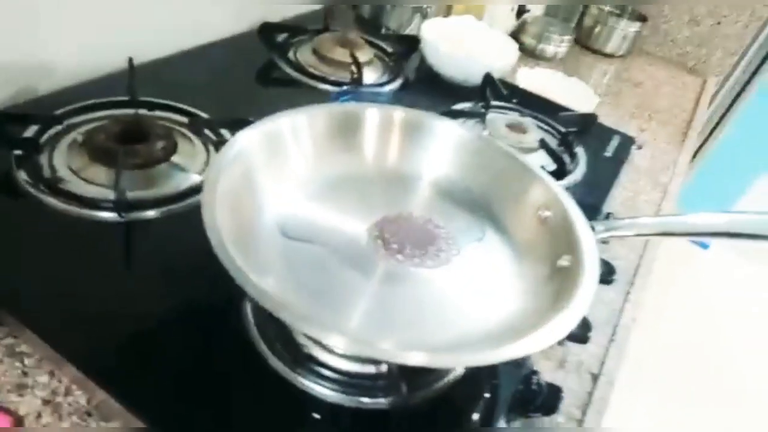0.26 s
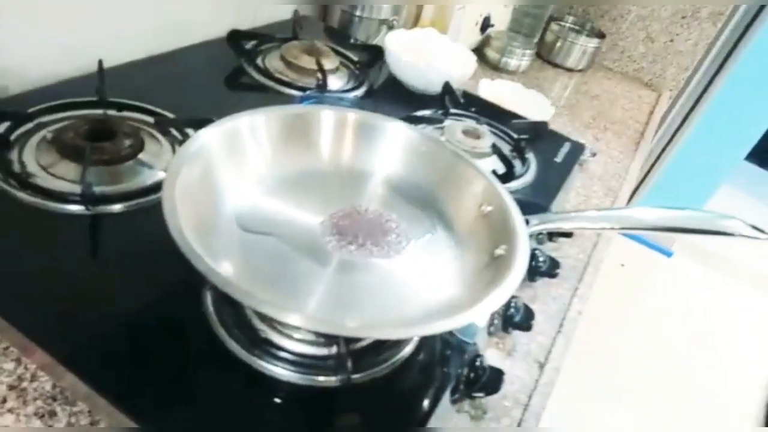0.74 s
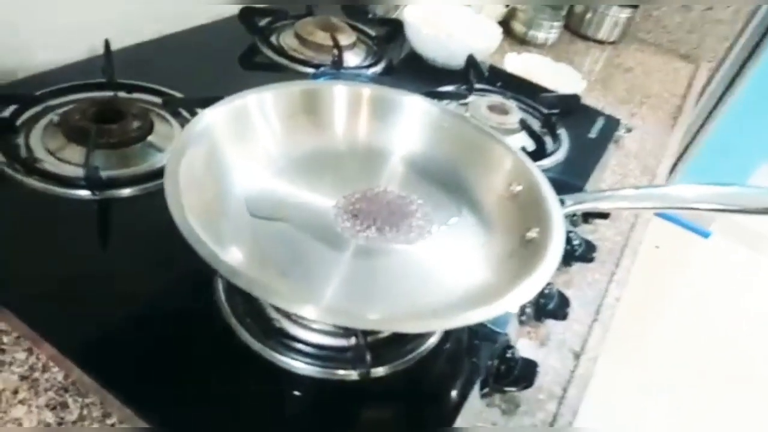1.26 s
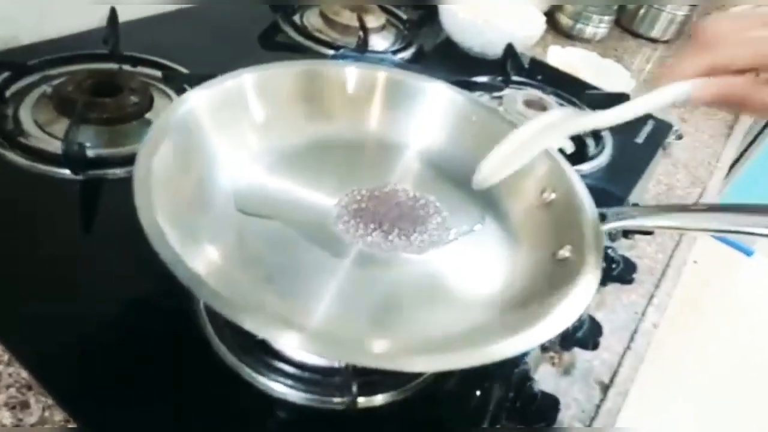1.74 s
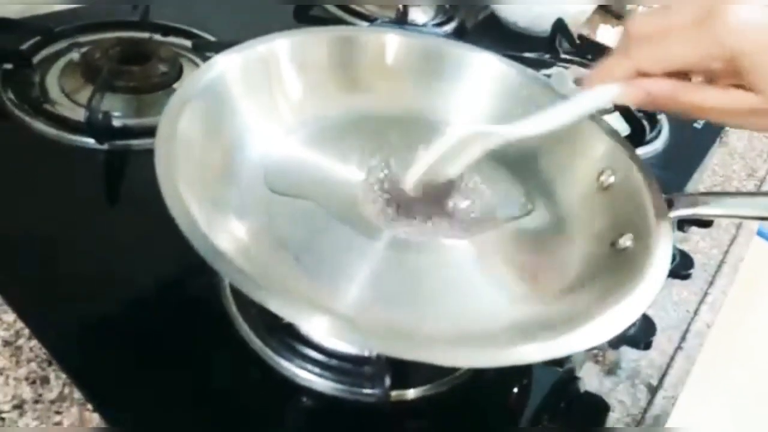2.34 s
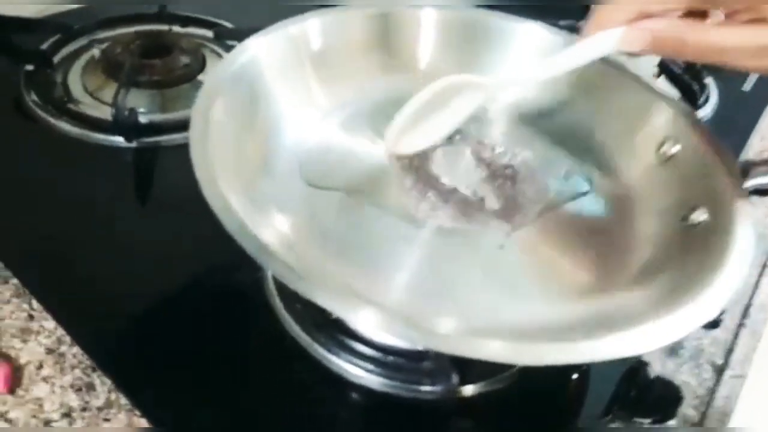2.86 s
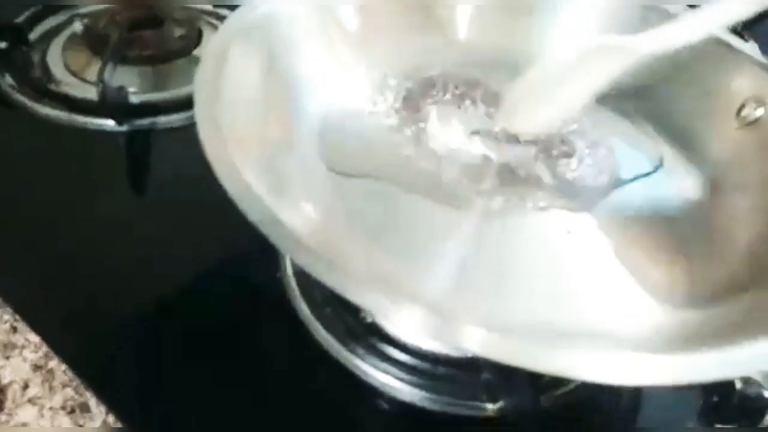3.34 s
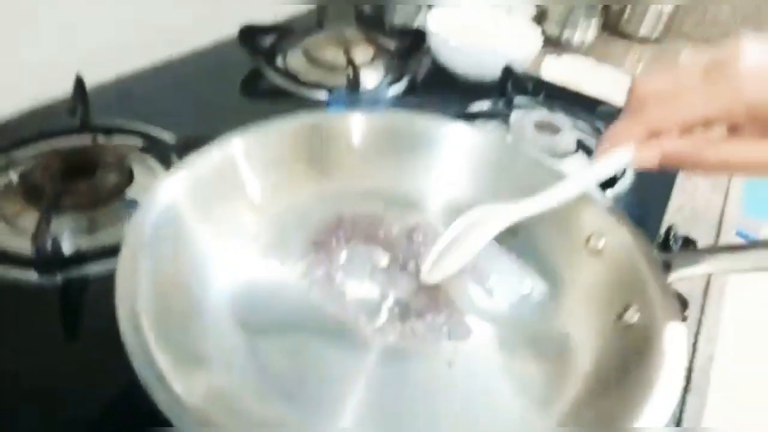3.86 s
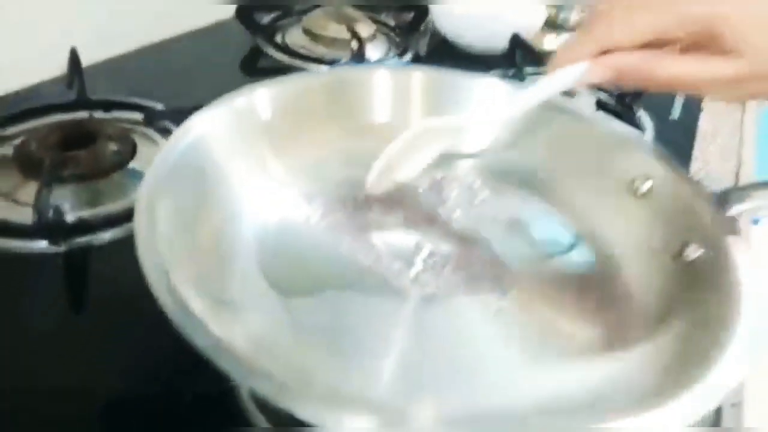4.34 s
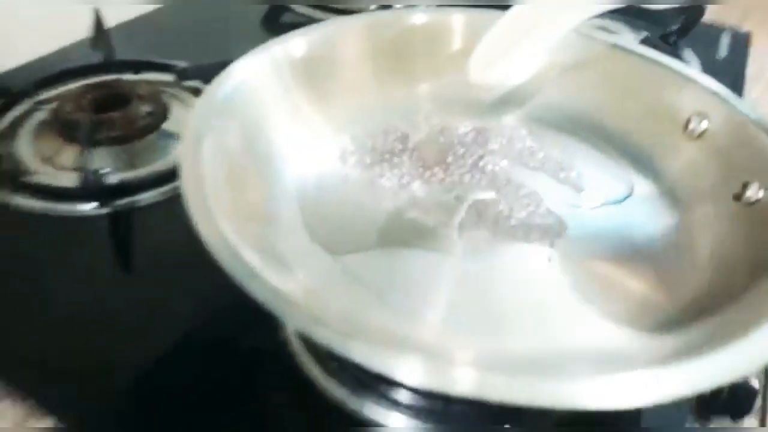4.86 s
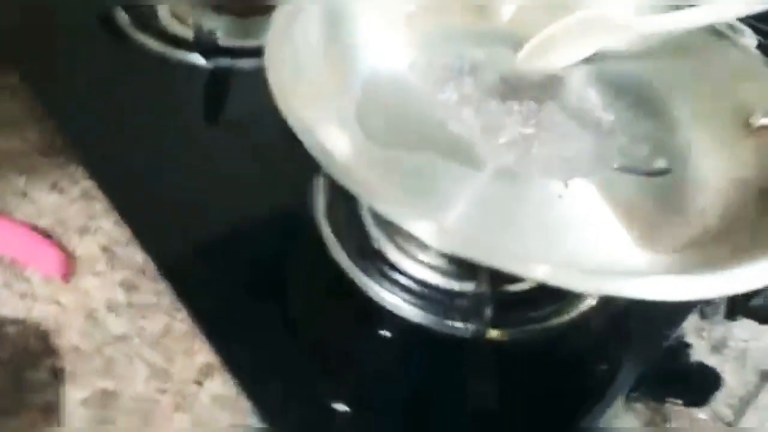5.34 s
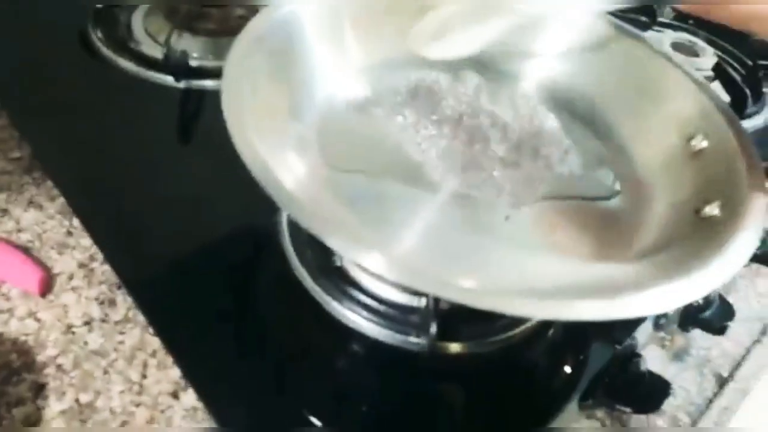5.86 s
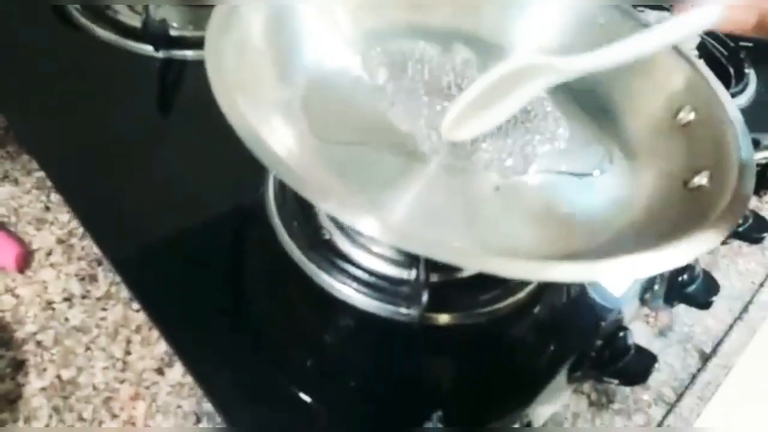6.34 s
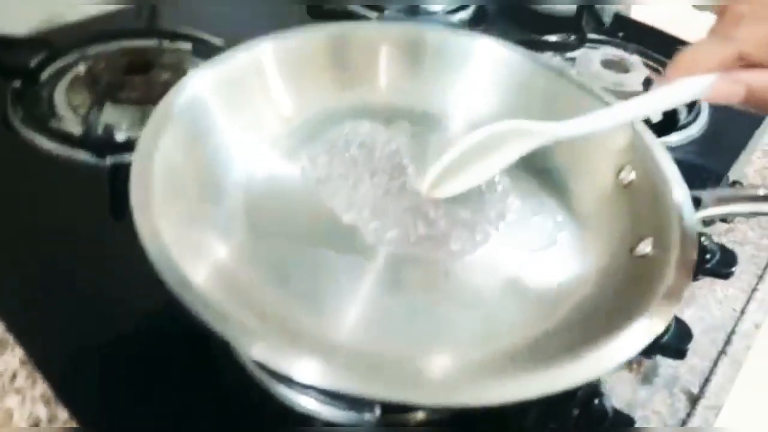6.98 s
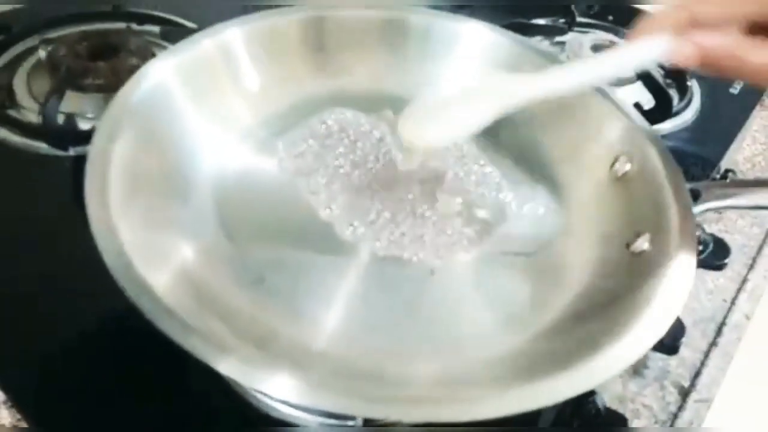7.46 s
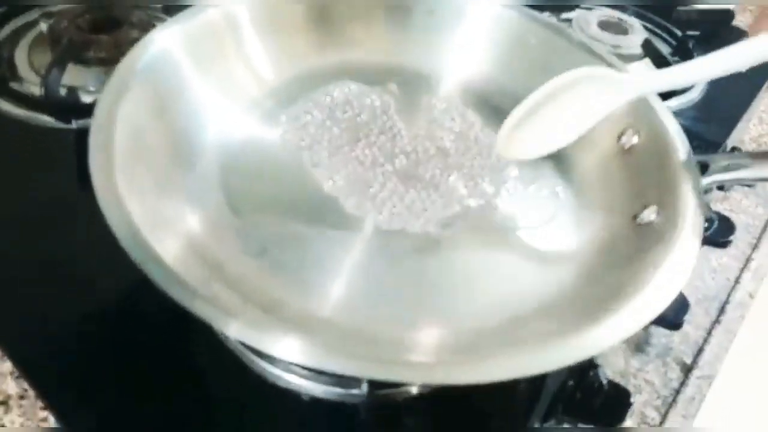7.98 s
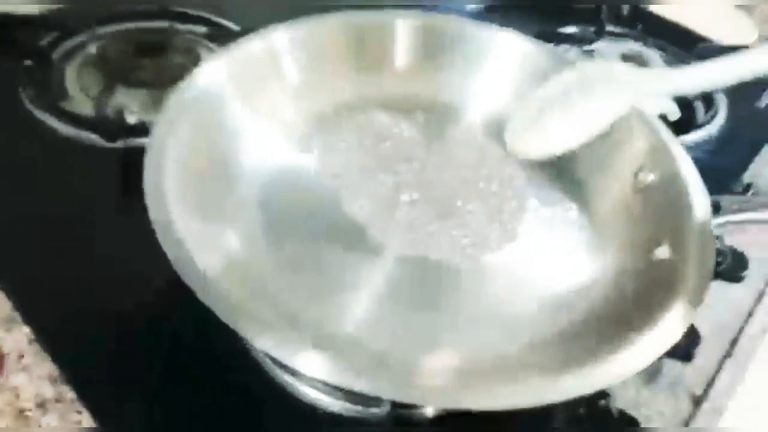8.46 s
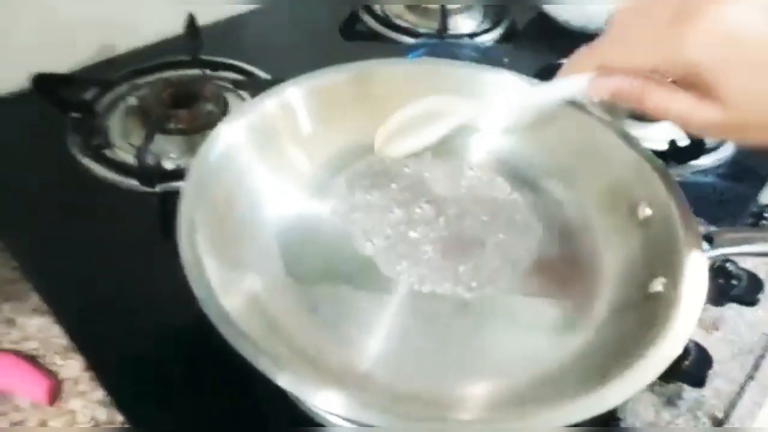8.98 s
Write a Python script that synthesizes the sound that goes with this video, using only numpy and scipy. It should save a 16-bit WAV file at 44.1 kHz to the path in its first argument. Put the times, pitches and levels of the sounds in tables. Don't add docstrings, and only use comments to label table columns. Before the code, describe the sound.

In a small, lightly echoing kitchen, a dish knocks twice on the counter with a brief ringing buzz. Quiet sizzling follows, then spoon taps and scrapes ring a steel pan while mustard seeds pop in bright, dry clicks, densest in the middle. Stirring thins out later, leaving steady fine fizz, sparse pops and a distant horn. Close handheld stereo microphone with soft handling rumble; pan treble leans right.

```python
import sys
import numpy as np
from scipy import signal
from scipy.fft import rfft, irfft
from scipy.io import wavfile
from scipy.ndimage import uniform_filter1d

SR = 44100
rng = np.random.default_rng(int(sys.argv[2]) if len(sys.argv) > 2 else 0)


def wav_out(sig):
    wavfile.write(sys.argv[1], SR, np.round(np.clip(np.atleast_2d(sig).T, -1, 1) * 32767).astype(np.int16))


def ratio_of_db(decibels):
    return 10 ** (np.asarray(decibels, float) / 20)


N = 406161


def rms_one(x):
    return x / np.sqrt(np.mean(x ** 2) + 1e-20)


def at_hz(points, hz):
    point_hz, value = np.transpose(points)
    return np.interp(np.log(hz + 1), np.log(point_hz), value)


def shape(points, size=2048):
    spectrum_db = at_hz(points, np.fft.rfftfreq(size, 1 / SR))
    cepstrum = irfft(np.log(ratio_of_db(spectrum_db)))
    cepstrum[1:size // 2] *= 2
    cepstrum[size // 2 + 1:] = 0
    return irfft(np.exp(rfft(cepstrum)))


def through(x, response):
    return signal.oaconvolve(np.atleast_2d(x), np.atleast_2d(response), axes=1)[:, :N]


def band(x, low_hz, high_hz):
    return signal.sosfilt(signal.butter(2, [low_hz, high_hz], "band", fs=SR, output="sos"), x)


def level_in(x, low_hz, high_hz):
    return x / np.sqrt(np.mean(band(x, low_hz, high_hz) ** 2))


def drift(rate):
    r = np.exp(-80 * np.pi * rate / SR)
    noise = rng.standard_normal(N // 40 + 2002)
    slow = signal.lfilter([1], [1, -2 * r, r * r], noise)[2000:]
    return np.interp(np.arange(N) / 40, np.arange(len(slow)), rms_one(slow))


def grains(per_s, spread_db, channels=1):
    size_db = spread_db * np.minimum(rng.exponential(1, (channels, N)), 5)
    sizes = ratio_of_db(size_db) * rng.choice([-1, 1], (channels, N))
    return rms_one(sizes * (rng.random((channels, N)) < per_s / SR))


def gestures(start, length, db, attack_s, swell_db, release_s):
    t, out = np.arange(N) / SR, np.full(N, -99.)
    for s, d, top in zip(start, length, db):
        a, b = max(int((s - attack_s) * SR), 0), int((s + d + release_s) * SR)
        corners_s = [s - attack_s, s, s + d, s + d + release_s]
        level = top + np.interp(t[a:b], corners_s, [-60, -swell_db, 0, -60])
        out[a:b] = np.maximum(out[a:b], level)
    return out


def body(modes, sides, soft_s=0.00018):
    t = np.arange(SR // 4)[:, None] / SR
    hz, db, t60 = np.transpose(modes)
    phases = sides * rng.uniform(-np.pi, np.pi, (2, 1, len(hz))) * np.clip(hz / 3000, 0, 1)
    contact = (1 - np.exp(-t / soft_s)) ** 2
    return np.sum(contact * ratio_of_db(db - 60 * t / t60) * np.sin(2 * np.pi * hz * t + phases), axis=2)


def ring_level(response):
    return np.sqrt(np.sum(response ** 2) / 2)


def struck(times, levels_db, modes, sides, scatter_db, soft_s):
    out, scatter = np.zeros((2, N)), rng.normal(0, scatter_db, (len(times), len(modes)))
    for k, mode in enumerate(modes):
        clicks = np.zeros(N)
        clicks[(np.array(times) * SR).astype(int)] = ratio_of_db(levels_db + scatter[:, k])
        out += through(clicks, body([mode], sides, soft_s))
    return out


def scatter_in_bowl(x, echo_db, fade_s):
    t = np.arange(900) / SR
    echoes = band(grains(1800, 2.6, channels=2)[:, :900], 800, 18700)
    return x + through(x, echoes * ratio_of_db(echo_db) * np.exp(-t / fade_s))


# pitch_hz, fade_s (by 60 dB)
KITCHEN_FADE = [(200, 0.76), (2000, 0.62), (9000, 0.5)]


def kitchen(x):
    t, tail = np.arange(SR // 2) / SR, 0
    for hz in 125 * 2. ** np.arange(7):
        noise = band(rng.standard_normal((2, len(t))), hz / np.sqrt(2), hz * np.sqrt(2))
        tail = tail + noise * ratio_of_db(-60 * t / at_hz(KITCHEN_FADE, hz)) * np.clip(t / 0.0038, 0, 1)
    return through(x, tail / ring_level(tail))


# pitch_hz, level_db (per Hz)
ROOM_TONE = [(15, -26), (25, -13), (69, -14.5), (107, -4), (197, -7), (224, -13.5), (279, -11.5),
             (450, -22), (680, -17.5), (845, -21.5), (4500, -26.5), (5850, -58.5)]


def room_hush():
    hush = through(rng.standard_normal((2, N)), shape(ROOM_TONE, size=8192))
    return band(level_in(hush, 530, 2120) * ratio_of_db(-70), 330, 5600)


def rumble():
    thuds = ratio_of_db(stroke_levels()[1] - 31) + ratio_of_db(rattle_levels()[0] - 24)
    low = rng.standard_normal(N) + 0.4 * rng.standard_normal((2, N))
    hum = rms_one(band(through(low, shape(ROOM_TONE, size=8192)), 68, 760))
    fizz_db = frying_level()
    steady = ratio_of_db(-68 + 0.33 * (fizz_db - fizz_db.mean()))
    return hum * (steady + uniform_filter1d(thuds, size=2000)) * ratio_of_db(5 + 2 * drift(8.2))


# start_s, length_s, level_db
HAND_SHIFTS = [(0.595, 0.39, -65.5), (2.9, .2, -72), (3.4, 0.14, -66), (4.91, .2, -64), (5.7, .15, -68),
               (6.4, 0.11, -65), (8.595, 0.18, -60)]


def grip():
    db = gestures(*np.transpose(HAND_SHIFTS), attack_s=0.67, swell_db=3.4, release_s=0.43)
    shake = rng.standard_normal(N) + 0.48 * rng.standard_normal((2, N))
    shake = rms_one(band(band(shake, 39, 93), 39, 93))
    return shake * ratio_of_db(np.maximum(db, -81) + 2.5)


# start_s, end_s, pitch_hz, level_db
HORN_NOTES = [
    (5.56, 5.705, 1050, -56.5),
    (6.213, 6.374, 1078, -60),
    (8.014, 8.238, 819, -60),
    (8.24, 8.518, 810, -69),
]


def horn():
    t, out = np.arange(N) / SR, 0
    for start, end, hz, db in HORN_NOTES:
        swell = np.clip(np.minimum((t - start) / 0.027, (end - t) / 0.025), 0, 1)
        out = out + swell * ratio_of_db(db + 2 * drift(33)) * np.sin(2 * np.pi * hz * t)
    return out * ratio_of_db([[1.5], [-1.5]])


# start_s, length_s, level_db
SOFT_SLIDES = [(1.395, 0.2, -56.5), (1.673, 0.073, -54.5), (2.065, 0.17, -56.5), (5.396, 0.28, -54),
               (9.157, .1, -62)]
# pitch_hz, level_db (per Hz)
SLIDE_TONE = [(590, -49), (1000, -8.5), (1250, -9.5), (1920, 0.5), (4080, -0.5), (9000, -15), (11700, -26),
              (19800, -120)]


def slides():
    db = gestures(*np.transpose(SOFT_SLIDES), attack_s=0.26, swell_db=0.51, release_s=0.4)
    hiss = level_in(through(grains(12000, 0.5, channels=2), shape(SLIDE_TONE)), 2000, 4900)
    return hiss * ratio_of_db(db + 2.5 + 0.37 * drift(25))


# start_s, length_s, body_db, edge_db
DISH_RATTLES = [(0.592, 0.0088, -24.5, -27), (0.597, 0.031, -30, -32), (0.657, 0.004, -31, -21.5),
                (0.671, 0.009, -33.5, -34), (0.803, 0.0039, -19.5, -14), (0.814, 0.032, -22.5, -25),
                (0.854, 0.048, -29.5, -46)]


def rattle_levels():
    s, length, body_db, edge_db = np.transpose(DISH_RATTLES)
    return (gestures(s, length, body_db, attack_s=0.0056, swell_db=-1.8, release_s=0.16),
            gestures(s, length, edge_db, attack_s=0.0019, swell_db=-1.1, release_s=0.029))


# start_s, level_db (peak)
DISH_KNOCKS = [(0.588, -25), (0.5954, -10.5), (0.8029, -6.5), (0.808, -9.5), (0.845, -32), (1.6782, -37)]
# pitch_hz, level_db, fade_s (by 60 dB)
DISH_MODES = [(850, -4, 0.097), (1186, -24, 0.098), (1580, -7.5, 0.051), (1770, -5, 0.058),
              (1928, -2, 0.053), (2160, -8, 0.054), (2290, -2, 0.023), (2240, -8, 0.047),
              (2770, -4.5, 0.053), (3240, -15, 0.052), (4050, -5, 0.092)]
# pitch_hz, level_db (per Hz)
CLACK_TONE = [(88, -31), (150, -18.5), (496, -8), (1440, -5), (1800, -1), (2260, -7), (3070, -6.5),
              (3440, -11.5), (10300, -37), (14000, -46)]


def dish():
    body_db, edge_db = rattle_levels()
    modes, clack = body(DISH_MODES, sides=0.32), shape(CLACK_TONE)
    ring = through(grains(2100, 1.0) * ratio_of_db(body_db - 13.5), modes / ring_level(modes))
    broad = level_in(through(grains(3000, 3.4, channels=2), clack), 490, 1480) * ratio_of_db(body_db - 9)
    edge = rms_one(band(grains(2700, 4.5, channels=2), 3400, 6430)) * ratio_of_db(edge_db - 7.0)
    s, db = np.transpose(DISH_KNOCKS)
    knocks = np.zeros(N)
    knocks[(s * SR).astype(int)] = ratio_of_db(db - 2.5)
    knocks = through(knocks, clack / np.max(np.abs(clack)))
    return ring + broad + edge + scatter_in_bowl(knocks, echo_db=-16.5, fade_s=0.014)


# start_s, level_db (peak), pitch_hz, fade_s (by 60 dB)
DISH_CLINKS = [(.591, -18, 3700, 0.017), (.5965, -24, 2057, 0.035), (.603, -17, 1950, 0.024),
               (.619, -26, 2120, .03), (.63, -24, 2220, 0.019), (.659, -17.5, 3720, 0.028),
               (.66, -24, 4700, .02), (.661, -26, 2270, 0.026), (0.658, -34, 6620, 0.055),
               (.672, -29.5, 3640, .03), (.677, -32, 2220, 0.044), (.679, -25, 4230, 0.023),
               (.682, -27, 3780, 0.034), (0.802, -30, 2950, .03), (0.805, -22, 3950, 0.041),
               (0.804, -25, 4700, .03), (.805, -19, 1176, 0.064)]
# start_s, length_s, level_db
FOOT_BUZZES = [(.81, .034, -23)]
# pitch_hz, level_db, fade_s (by 60 dB)
BUZZ_MODES = [(2210, -1, .035), (2330, 0, .04), (1450, -12, .03), (3400, -9, .03)]


def clinks():
    out, t = np.zeros((2, N)), np.arange(2600) / SR
    phases = rng.uniform(-0.81, 1, (len(DISH_CLINKS), 2, 1))
    for (s, db, hz, t60), phase in zip(DISH_CLINKS, phases):
        fade = ratio_of_db(db - 60 * t / t60) * (1 - np.exp(-t / 0.00095))
        at = int(s * SR)
        out[:, at:at + len(t)] += fade * np.sin(2 * np.pi * hz * t + 1.5 * phase)
    buzz = rms_one(through(grains(4000, 1.2), body(BUZZ_MODES, sides=.7)))
    buzz_db = gestures(*np.transpose(FOOT_BUZZES), attack_s=.012, swell_db=0, release_s=.02)
    return out + buzz * ratio_of_db(buzz_db)


# start_s, pitch_hz, level_db, fade_s
RING_NOTES = [(.66, 3740, -45, .3), (.81, 228, -34, .5), (2.615, 3690, -43, .78), (3.9, 721, -53, 1.0),
              (4.667, 721, -45, 1.1), (5.096, 510, -48, .055), (5.68, 1200, -55, 1.2),
              (7.15, 1346, -50, 1.1)]


def long_rings():
    out, t = np.zeros((2, N)), np.arange(SR) / SR
    edges = np.clip(np.minimum(t / 0.0027, (1 - t) / 0.33), 0, 1)
    for s, hz, db, t60 in RING_NOTES:
        at = int(s * SR)
        out[:, at:at + SR] += ratio_of_db(db - 60 * t / t60) * np.sin(2 * np.pi * hz * t) * edges
    return out * ratio_of_db(2 * drift(9.9))


# start_s, left_db (peak), right_db (peak)
PORT_HIT = (8.5331, -1.5, -24)


def seed_on_port():
    s, left_db, right_db = PORT_HIT
    t, out, tick = np.arange(300) / SR, np.zeros((2, N)), 0
    for hz, strength in [(5900, 1), (3100, 0.61), (12000, 0.11)]:
        tick = tick + strength * np.sin(2 * np.pi * hz * t)
    tick = band(tick * np.exp(-t / 0.00032), 1400, 9600)
    at = int(s * SR)
    out[:, at:at + len(t)] = tick / np.max(np.abs(tick)) * ratio_of_db([[left_db], [right_db]])
    return out


# time_s, level_db
FRYING = [(0.0, -60.5), (1.13, -55.5), (1.9, -54.5), (3.02, -40.5), (3.6, -47.5), (5.41, -45.5),
          (5.82, -47.5), (6.5, -49), (8.03, -47), (9.21, -48.5)]


def frying_level():
    s, db = np.transpose(FRYING)
    return np.interp(np.arange(N) / SR, s, db)


# pitch_hz, level_db (per Hz)
FIZZ_TONE = [(880, -51.5), (1500, -13.5), (2870, -11), (3400, -15.5), (4200, -14.5), (4810, -4.5),
             (6620, 0), (8290, -16), (13000, -20.5), (13500, -71)]


def fizz():
    bubbles = rms_one(through(grains(9000, 2.7, channels=2), shape(FIZZ_TONE)))
    return bubbles * ratio_of_db(frying_level() - 6.5 + 0.23 * drift(17))


def swept_seeds():
    out, count, cycles = 0, 10, 13.0
    for hz in np.geomspace(2500, 11000, count):
        r = ratio_of_db(-60 * hz / cycles / SR)
        ticks = grains(1800 / count, 1.4, channels=2) * ratio_of_db(2.7 * drift(4.2))
        ring = [1, 0, -1, 1, -2 * r * np.cos(2 * np.pi * hz / SR), r * r]
        rung = rms_one(signal.sosfilt([ring, ring], ticks + 1e-18))
        out = out + rung * ratio_of_db(at_hz(FIZZ_TONE, hz)) * hz ** 0.071
    return rms_one(out)


# start_s, level_db (peak),
# pitch_hz
LOUD_POPS = [(2.615, -9.5, 5540), (3.004, -16, 5900), (3.183, -16, 6130), (3.25, -24, 5000),
             (3.4741, -16, 6000), (3.681, -20, 4350), (3.709, -24, 6650), (3.873, -15, 4030),
             (3.902, -23, 5000), (4.0868, -19.5, 4500), (4.13, -14.5, 6020), (4.2795, -19.5, 6950),
             (4.3303, -20.5, 3930), (4.503, -23.5, 5300), (4.6666, -11, 5210), (4.7266, -17, 6370),
             (4.78, -21.5, 5700), (5.1136, -23, 5750), (5.267, -18.5, 6770), (5.629, -15.5, 6200),
             (5.679, -9, 4230), (5.78, -20, 7100), (5.968, -19, 6330), (6.3908, -39, 4760),
             (7.0739, -11, 3750), (7.7718, -28.5, 5750), (8.581, -21, 6500)]
# start_s, level_db (peak)
SOFT_POPS = [(2.0385, -35), (2.518, -30.5), (2.916, -25), (3.071, -28), (3.1464, -24.5), (3.5942, -22),
             (3.654, -32), (3.771, -34), (4.024, -28), (4.546, -32), (4.8436, -26), (4.8782, -25),
             (4.9543, -24.5), (5.201, -26.5), (5.39, -25.5), (6.198, -33), (6.306, -28), (6.412, -26.5),
             (6.425, -26), (6.57, -33), (6.656, -36), (6.669, -40.5), (6.841, -35.5), (6.874, -41),
             (6.986, -38), (7.049, -25), (8.4677, -33.5)]
# start_s, level_db (peak)
MORE_SOFT_POPS = [(2.2408, -37), (2.2784, -42), (2.8536, -28), (3.106, -28), (3.3388, -41), (3.3583, -30),
                  (3.4585, -29), (3.7386, -30), (3.8544, -36), (4.2872, -21), (4.3879, -34), (4.4184, -32.5),
                  (4.448, -30.5), (4.5608, -26.5), (4.584, -27), (4.7957, -34), (4.81, -40), (4.8309, -30),
                  (4.9811, -32), (5.0345, -36), (5.0577, -33), (5.2443, -30), (5.3752, -33.5), (5.4817, -34),
                  (5.542, -35), (5.5737, -37), (5.7444, -36), (6.0253, -49), (6.0477, -33), (6.4532, -29),
                  (6.7206, -46), (6.742, -35), (6.8633, -43), (7.0354, -44), (7.5921, -48), (7.752, -38),
                  (8.6193, -38.5), (9.1002, -38.5), (9.14, -39)]
# pitch_hz, level_db (per Hz)
POP_TONE = [(410, -38), (700, -28.5), (3090, -9.5), (4030, -11.5), (6330, -4.5), (8040, -39), (10300, -0.5),
            (13300, -97), (14200, -8)]


def pops():
    out, t = np.zeros((2, N)), np.arange(600) / SR
    click = shape(POP_TONE)[:600]
    click = click / np.max(np.abs(click))
    seeds = LOUD_POPS + [(s, db, 6390) for s, db in SOFT_POPS + MORE_SOFT_POPS]
    luck = rng.standard_normal((len(seeds), 5))
    spit_s = .0011 * np.exp(.5 * np.clip(luck[:, 2, None, None], -1, 2))
    lasting = t / spit_s
    spits = band(rng.standard_normal((len(seeds), 2, len(t))), 3890, 6620)
    spits = spits * (lasting * np.exp(1 - lasting)) ** 2
    for (s, db, hz), (pan, tune, wait, tune_again, loss), spit in zip(seeds, luck, spits):
        ring = np.sin(2 * np.pi * hz * np.exp(0.066 * tune) * t) * np.exp(-t / 0.0015)
        pop = 0.55 * click + 0.55 * ring + .9 * spit
        side_db = np.array([[1], [-1]]) * (-5.5 + 2.2 * pan) / 2
        at = int((s + 0.00076) * SR)
        out[:, at:at + len(t)] += pop * ratio_of_db(db + side_db)
        at += int(0.014 * np.exp(.4 * wait) * SR)
        landing = np.sin(2 * np.pi * hz * np.exp(0.23 * tune_again) * t) * np.exp(-t / 0.0014)
        out[:, at:at + len(t)] += landing * ratio_of_db(db - 11.5 + 5.3 * loss)
    return scatter_in_bowl(out, echo_db=-25, fade_s=.006)


# start_s, ring_db (peak), crack_db (over ring), handle_db (over ring)
SPOON_TAPS = [(2.275, -29.5, -29, -19), (2.351, -12, -8.5, -8), (2.615, -20, 9, 5.5),
              (2.862, -9.5, -17, -19), (2.949, -19, -15, -10), (3.005, -7.5, -9.5, -8),
              (3.19, -26.5, -23, -30), (3.4, -32, -7, -27), (3.44, -19, -25, -4), (3.476, -5.5, -8.5, -2.5),
              (3.513, -15.5, -27, -2), (3.687, -20, -5, -4), (3.901, -9.5, -2, 2), (4.265, -20, -40, -22),
              (4.315, -19, -11, -24), (4.668, -18, 9, 2), (4.946, -35, 6, -23), (5.266, -53.5, 20, 8),
              (5.678, -23, 11, -9), (5.73, -29, -10, 2), (5.978, -31, -24, -15), (6.035, -18, -23, -24),
              (6.744, -22, -26, -16), (7.075, -28, 15, -2), (7.124, -21, -4.5, 6.5),
              (7.17, -14.5, -17, 0.5)]
# pitch_hz, level_db, fade_s (by 60 dB)
SPOON_MODES = [(873.3, 0, 0.089), (894.3, 6, 0.041), (935, -1.5, 0.036)]
# pitch_hz, level_db, fade_s (by 60 dB)
HANDLE_MODES = [(1470, -2.5, 0.024), (1565, -4.5, 0.055)]
# pitch_hz, level_db, fade_s (by 60 dB)
PAN_MODES = [(1534, -5, 0.011), (1579, -2.5, 0.022), (1815, -8, 0.033), (2220, -8, 0.14),
             (2419, -0.5, 0.031), (2704, -8, 0.049), (3033, -3, 0.04), (3510, -9.5, 0.11),
             (3740, -1, 0.059), (4090, 4, 0.018), (4450, -5, 0.083), (5210, 0.5, 0.027),
             (5750, -4.5, 0.054), (6650, -4.5, 0.064)]


def taps():
    s, db, crack_db, handle_db = np.transpose(SPOON_TAPS)
    out = struck(s, db - 15.5, SPOON_MODES, sides=0.33, scatter_db=5.5, soft_s=0.0016)
    out += struck(s, db + handle_db - 4.5, HANDLE_MODES, sides=0.72, scatter_db=0.0, soft_s=0.00056)
    out += struck(s, db + crack_db - 16.5, PAN_MODES[2:], sides=0.69, scatter_db=4.5, soft_s=0.000071)
    t = np.arange(1500) / SR
    for at, level in zip((s * SR).astype(int), ratio_of_db(db + crack_db - 2.5)):
        crack = rng.standard_normal((2, len(t))) * np.exp(-t / 0.004)
        out[:, at:at + len(t)] += level * band(crack, 1020, 3460)
    return out


# start_s, length_s, drag_db (on its low modes), rasp_db (on steel), swept_db (seeds)
SPOON_STROKES = [(2.26, 0.11, -38, -43.5, -45), (2.616, 0.091, -27.5, -32, -37.5),
                 (2.85, 0.0082, -20, -46, -43.5), (2.923, 0.034, -32.5, -44, -39),
                 (2.992, 0.0083, -24.5, -34.5, -36), (3.157, 0.045, -37, -46, -41.5),
                 (3.389, 0.067, -32.5, -49, -43.5), (3.472, 0.015, -23.5, -31.5, -32.5),
                 (3.568, 0.14, -38.5, -47, -36.5), (3.698, 0.014, -50, -46.5, -33.5),
                 (3.89, 0.024, -28, -34.5, -37), (3.938, 0.088, -58, -46.5, -37.5),
                 (4.251, 0.067, -30, -45.5, -42), (4.52, 0.038, -86, -57.5, -44),
                 (4.676, 0.031, -25, -36, -39.5), (4.803, 0.085, -63, -56.5, -45.5),
                 (4.998, 0.14, -78, -59.5, -55), (5.687, 0.033, -41, -34.5, -48),
                 (5.725, 0.061, -30, -35, -34.5), (5.974, 0.091, -35.5, -44.5, -42.5),
                 (6.388, 0.072, -46, -49, -41), (6.736, 0.0087, -33.5, -54.5, -52),
                 (6.93, 0.16, -75, -57, -53), (7.08, 0.072, -34, -29.5, -34),
                 (7.122, 0.043, -25.5, -34.5, -38), (7.149, 0.025, -22.5, -38, -41),
                 (7.761, 0.033, -33, -51.5, -39)]


def stroke_levels():
    s, length, drag_db, rasp_db, swept_db = np.transpose(SPOON_STROKES)
    return (gestures(s, length, drag_db, attack_s=0.031, swell_db=9.4, release_s=0.13),
            gestures(s, length, rasp_db, attack_s=0.056, swell_db=4.5, release_s=0.29),
            gestures(s, length, swept_db, attack_s=0.047, swell_db=8.3, release_s=0.42))


# pitch_hz, level_db (per Hz)
RASP_TONE = [(180, -62), (300, -8.5), (715, -30.5), (910, -1.5), (1160, -8.5), (1600, -8), (1760, -5.5),
             (6580, -15), (10800, -43), (14000, -74)]


def stirring():
    drag_db, rasp_db, swept_db = stroke_levels()
    spoon = body(SPOON_MODES, sides=0.69, soft_s=0.0034)
    handle = body(HANDLE_MODES, sides=2.1, soft_s=0.00061)
    pan = body(PAN_MODES, sides=1.0)
    slips = grains(2200, 1.13) * ratio_of_db(drag_db - 8.0 + 2.75 * drift(25))
    drag = through(slips, spoon / ring_level(spoon))
    slips = grains(2500, 1.5) * ratio_of_db(rasp_db - 4.5 + 2 * drift(10))
    drag += through(slips, handle / ring_level(handle))
    rub = grains(3000, 1.7) * ratio_of_db(rasp_db - 2.0 + 3.3 * drift(45)) / ring_level(pan)
    sung = 0
    for k in range(5):
        sung = sung + through(rub * ratio_of_db(2.5 * drift(14)), body(PAN_MODES[k::5], sides=0.77))
    rasp = level_in(through(grains(5000, 2.1, channels=2), shape(RASP_TONE)), 1600, 4200)
    rasp = rasp * ratio_of_db(rasp_db - 5.5 + 2.5 * drift(30))
    swept = swept_seeds() * ratio_of_db(swept_db - 2 + 2.5 * drift(30))
    return drag + sung + rasp + swept


# pitch_hz, left_over_right_db
PAN_BALANCE = [(60, -25), (230, 2), (910, 1.5), (3530, 1), (13700, -16.5)]


def scene():
    lean = [shape([(hz, side * db / 2) for hz, db in PAN_BALANCE], size=256) for side in (1, -1)]
    pan = through(stirring() + taps() + fizz(), lean) + pops()
    pan[0] = np.roll(pan[0], 5)
    counter = dish() + clinks()
    wet = kitchen(ratio_of_db(-12) * (pan + counter))
    room = room_hush() + rumble() + grip()
    return pan + counter + wet + long_rings() + slides() + room + horn() + seed_on_port()


# pitch_hz, level_db
MUTE_BELOW = [(500, -24), (1500, -15), (2600, -4.5), (4200, -3.2), (5700, -6), (13000, -3.2)]


def suppress(x, depth_db):
    hz, _, cells = signal.stft(x, SR, nperseg=1024)
    power = np.abs(cells.sum(axis=0)) ** 2
    around = uniform_filter1d(power, size=36, axis=0)
    patch = uniform_filter1d(uniform_filter1d(power, size=4, axis=0), size=3, axis=1)
    limit = uniform_filter1d(around, size=3, axis=1) * ratio_of_db(2 * at_hz(MUTE_BELOW, hz))[:, None]
    weak = patch < limit
    total = power.sum(axis=0)
    after_blow = np.roll(total, 2) + np.roll(total, 3) > 5 * total
    faint = uniform_filter1d(power, size=6, axis=0) < .45 * around
    weak |= after_blow & faint & (hz > 2500)[:, None]
    steady = around < 1.6 * uniform_filter1d(around, size=9, axis=1)
    return signal.istft(cells * ratio_of_db(depth_db * (weak & steady)), SR, nperseg=1024)[1][:, :N]


def band_limit(x):
    return signal.sosfilt(signal.butter(12, 14320, fs=SR, output="sos"), x)


def record(dry):
    since = np.arange(N) / SR - PORT_HIT[0] - .003
    duck_db = np.clip(since / .002, 0, 1) * (6 + 12 * np.exp(-np.abs(since) / .008)) * (since < .043)
    gain = ratio_of_db(-uniform_filter1d(duck_db, size=60))
    taken = 0.91 * np.tanh(dry * gain / 0.83)
    taken = signal.sosfilt(signal.cheby2(7, 27, 13800, fs=SR, output="sos"), taken)
    return band_limit(suppress(taken, depth_db=-22))


dry = scene()
out = record(dry)
wav_out(out)
```